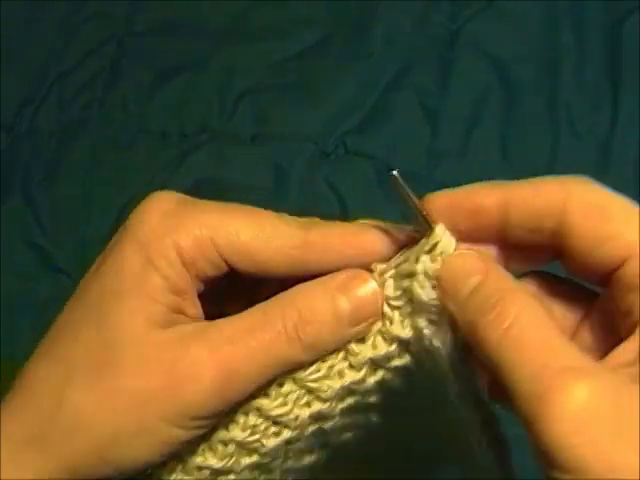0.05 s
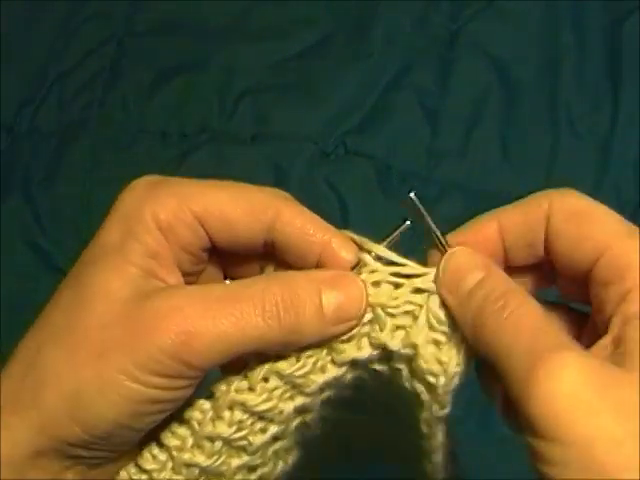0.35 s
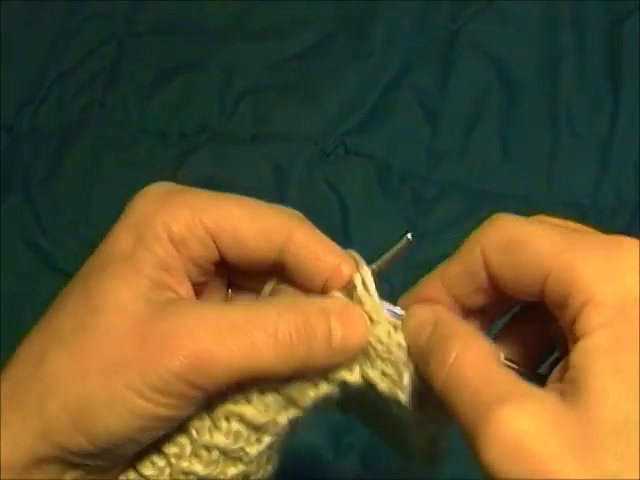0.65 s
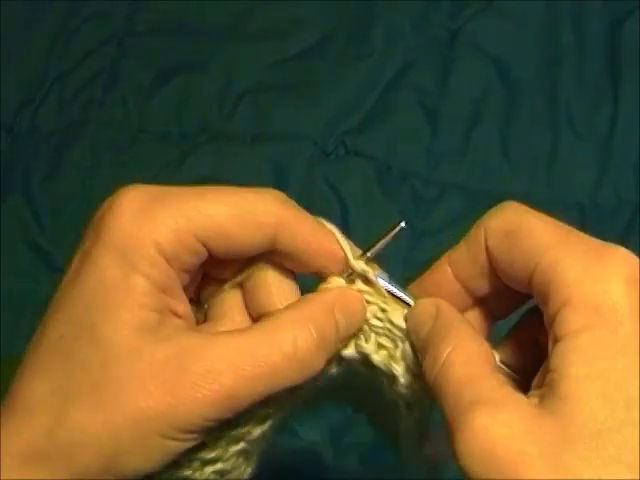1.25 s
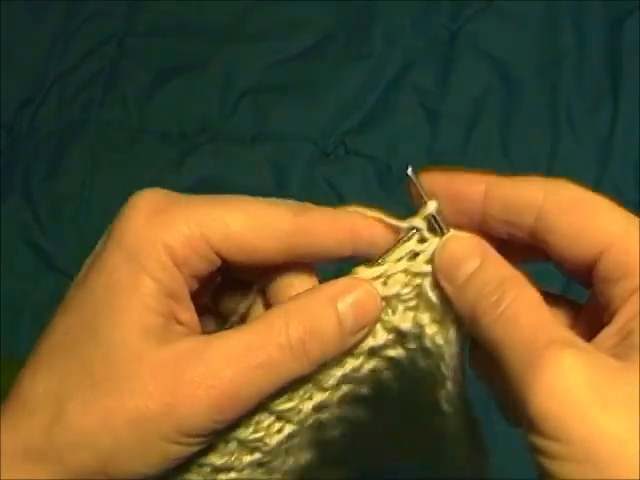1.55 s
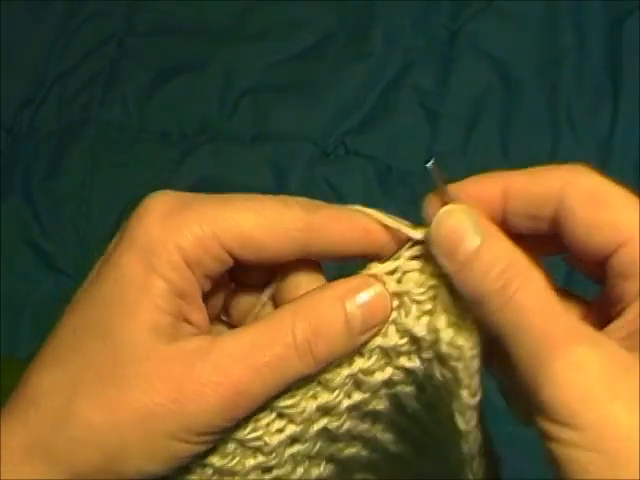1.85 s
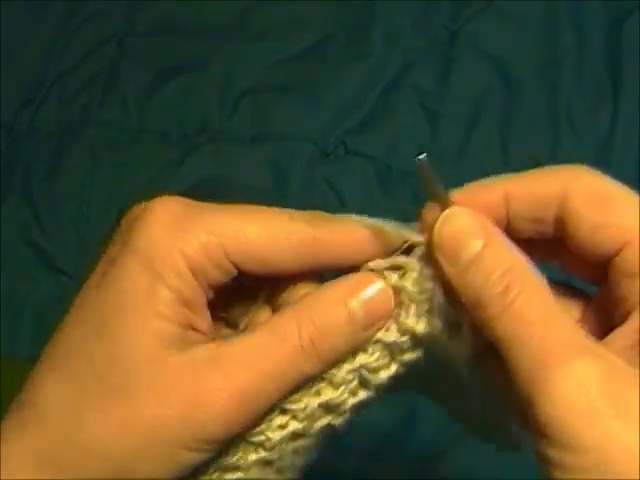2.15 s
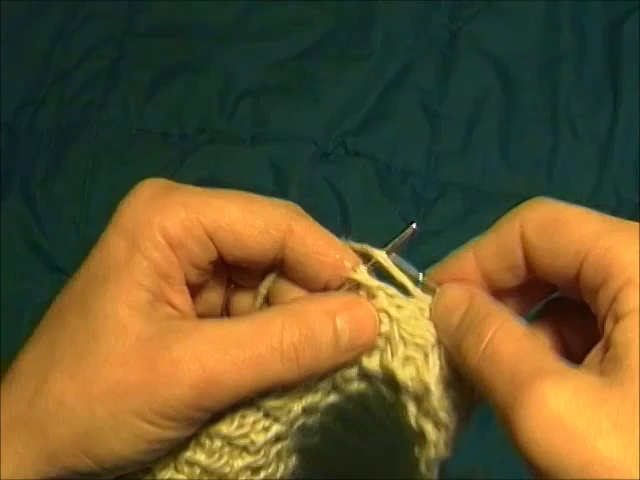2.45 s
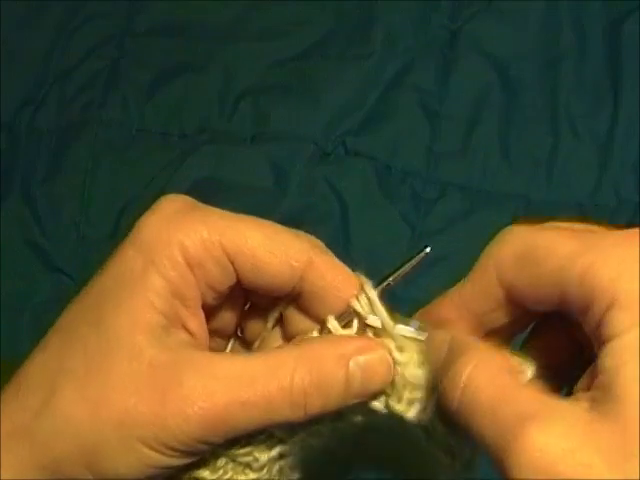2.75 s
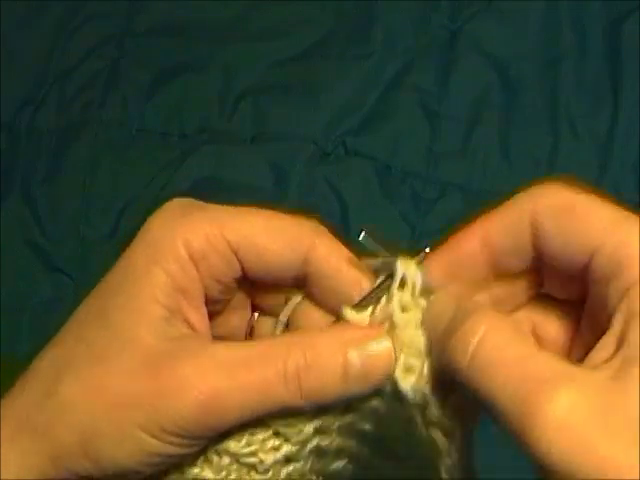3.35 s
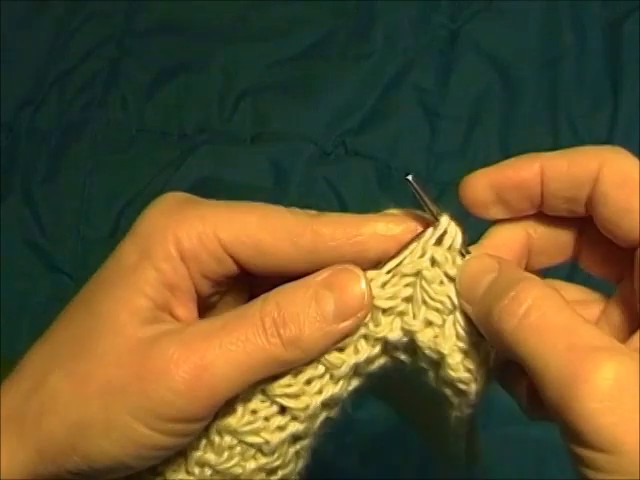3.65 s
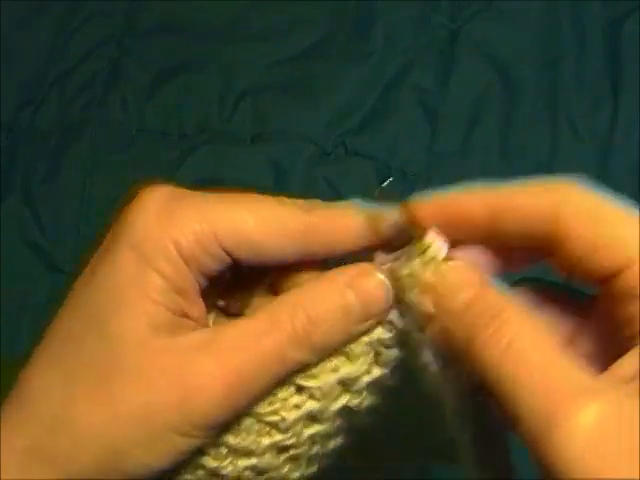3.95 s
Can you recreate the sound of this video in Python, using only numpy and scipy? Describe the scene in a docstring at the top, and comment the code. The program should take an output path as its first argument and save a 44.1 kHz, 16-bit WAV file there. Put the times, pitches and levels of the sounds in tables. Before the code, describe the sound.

Metal knitting needles tick faintly and yarn rustles over a steady room hum and hiss.

```python
"""A quiet room, with slow hand knitting close to a small microphone.
Two thin metal needles tick together, damped at once by fingers and wool. Yarn slides over them in soft
grainy strokes, a stitch catches now and then, and a finger bumps the work once. Needles and yarn sit
right of centre; under them lie mains hum, a faint motor whine and steady hiss."""
import sys
import numpy as np
from scipy import signal
from scipy.fft import rfft, irfft
from scipy.io import wavfile
from scipy.ndimage import uniform_filter1d

SR = 44100
rng = np.random.default_rng(int(sys.argv[2]) if len(sys.argv) > 2 else 0)


def wav_out(sig):
    """Save sig, one row per channel (or a flat mono array), as 16-bit PCM at SR to the path in sys.argv[1]."""
    wavfile.write(sys.argv[1], SR, np.round(np.clip(np.atleast_2d(sig).T, -1, 1) * 32767).astype(np.int16))


N = 176400
SCUFF_HZ = (3500, 10500)  # noise band of needle contacts and catching stitches


def undb(db):
    """Decibels to gain."""
    return 10 ** (np.asarray(db) / 20)


def pan(db):
    """Left and right gains for a level difference, left minus right."""
    return undb(np.array([[db], [-db]]) / 2)


def add(out, sound, start):
    """Mix a short sound into the stereo track at a time in seconds."""
    i = int(round(start * SR))
    out[:, i:i + sound.shape[1]] += sound[:, :N - i]


def band(x, edges_hz):
    """Gentle band-pass."""
    return signal.sosfilt(signal.butter(2, edges_hz, "band", fs=SR, output="sos"), x)


def unit(x):
    """Scale to rms 1."""
    return x / np.sqrt(np.mean(x ** 2))


def drift(rate_hz):
    """Slow random drift with rms 1."""
    hold = int(SR / rate_hz)
    steps = np.repeat(rng.standard_normal(N // hold + 1), hold)
    return unit(uniform_filter1d(steps, hold)[:N])


def fade(t, t60):
    """Exponential decay, 60 dB down after t60 seconds."""
    return np.exp(-np.log(1000) * t / t60)


def ring(t, modes):
    """Damped modes struck at t = 0."""
    return sum(undb(db) * fade(t, t60) * np.sin(2 * np.pi * hz * t) for hz, t60, db in modes)


def mains_hum():
    """Mains hum near the centre: a wavering fundamental under steady, mostly odd overtones."""
    # overtones of the mains (harmonic number, rms level [dB])
    overtones = [(2, -69), (3, -49), (4, -70.5), (5, -60), (7, -70.5), (9, -70.5), (11, -75), (17, -79),
                 (23, -82.5)]
    # contour of the fundamental (time [s], level before trim [dB])
    contour = [(0.0, -30), (0.03, -32.5), (0.08, -37.5), (0.12, -34), (0.63, -32), (1.28, -35.5),
               (2.16, -32), (2.23, -34), (2.38, -34), (2.66, -36), (2.71, -34), (3.09, -33), (3.13, -29.5),
               (3.2, -35.5), (3.22, -32), (3.89, -35), (3.98, -35.5), (4.0, -31)]
    mains_hz, trim_db, waver_db = 50, -1, 0.38
    t = np.arange(N) / SR
    phase = 2 * np.pi * mains_hz * t
    level_db = np.interp(t, *np.array(contour).T) + trim_db + waver_db * drift(rate_hz=16)
    fundamental = undb(level_db) * np.sin(phase)
    buzz = sum(undb(db) * np.sin(harmonic * phase) for harmonic, db in overtones)
    return np.sqrt(2) * (fundamental + buzz) * pan(db=-0.4)


def motor_whine():
    """A small motor, faint in the background: narrow bands of noise heard as unsteady tones."""
    # motor tones (frequency [Hz], half-width [Hz], rms level [dB])
    tones = [(3064, 22, -69.5), (3540, 130, -73.5), (7890, 14, -75)]
    out, freqs = np.zeros((2, N)), np.arange(N // 2 + 1) * SR / N
    for hz, half_width, db in tones:
        spectrum = rfft(rng.standard_normal((2, N))) / (1 + ((freqs - hz) / half_width) ** 2)
        out += undb(db) * unit(irfft(spectrum, N))
    return out


def hiss():
    """Even hiss of room and microphone, a little wider in the treble than in the upper bass."""
    # noise common to both channels (frequency [Hz], density before roll-off [dB/Hz])
    mid_curve = [(55, -70), (120, -81.5), (250, -87), (500, -91), (1000, -93), (2500, -95.5), (6000, -97.5),
                 (10300, -97.5), (11500, -100)]
    # noise opposite in the two channels (frequency [Hz], density before roll-off [dB/Hz])
    side_curve = [(25, -88), (50, -70), (100, -87), (250, -91), (500, -94), (1000, -96), (2500, -98),
                  (6000, -99), (10300, -99.5), (11500, -102)]
    low_cut_hz, high_cut_hz = 30, 11480
    freqs = np.maximum(np.arange(N // 2 + 1) * SR / N, 1)
    roll_off = 1 / np.sqrt((1 + (low_cut_hz / freqs) ** 4) * (1 + (freqs / high_cut_hz) ** 160))

    def coloured(curve):
        hz, db = np.array(curve).T
        shape = roll_off * undb(np.interp(np.log(freqs), np.log(hz), db))
        return irfft(rfft(rng.standard_normal(N)) * shape, N) * np.sqrt(SR / 2)

    mid, side = coloured(mid_curve), coloured(side_curve)
    return np.array([mid + side, mid - side]) * pan(db=-0.6)


def needle_ticks():
    """Held needles touch and bounce once by the microphone: each hit is a short ring and a scuff."""
    # needle contacts (time [s], level [dB], bounce delay [ms], bounce gain [dB], main ring [Hz],
    # low-mode gain [dB], scuff gain [dB], left minus right [dB])
    contacts = [(0.6673, -30.5, 0.71, -13, 9600, -14, -12, -8), (0.738, -42.5, .89, -2, 4500, -12, -10, -2),
                (1.0402, -33.5, 0.91, -5, 9100, 1, 1.5, -6), (1.3267, -42, .56, 4, 6700, 2.5, 1, -5),
                (1.5265, -34.5, 1.0, -14, 10200, -20, -14, -1), (1.6525, -41, 1.4, 7.5, 9900, 4.5, -6, -3),
                (2.6085, -34, 0.8, -1.5, 10060, -22, -11, -6), (3.0222, -35.5, 0.6, -10, 9300, -7, -10, -7),
                (3.3096, -45, .7, -3, 9000, 1, 2, -4), (3.7327, -45, 2.4, 2.5, 9900, -1, -3, -4)]
    # low and high modes of a held needle (frequency [Hz], t60 [s], relative level [dB])
    low_modes = [(3650, 0.0063, -17), (5440, 0.0061, -13.5)]
    high_modes = [(6760, 0.0024, -11), (8430, 0.003, -11.5), (10850, 0.0088, -12.5)]
    ring_t60_s, ring_gain_db = .005, -3.5
    out, t = np.zeros((2, N)), np.arange(SR // 20) / SR
    for start, db, bounce_ms, bounce_db, ring_hz, low_db, scuff_db, pan_db in contacts:
        main_mode = (ring_hz, ring_t60_s, ring_gain_db)
        metal = ring(t, high_modes + [main_mode]) + undb(low_db) * ring(t, low_modes)
        for lag, gain in ((0, 1), (bounce_ms / 1000, undb(bounce_db))):
            noise = rng.standard_normal((3, len(t)))  # left, right, common to both
            grit = (noise[:2] + noise[2]) / np.sqrt(2)
            scuff = undb(scuff_db) * band(grit * fade(t, t60=.004), SCUFF_HZ)
            add(out, undb(db) * gain * pan(pan_db) * (metal + scuff), start + lag)
    return out


def fibres(edges_hz):
    """Dense tiny slips of wool fibres, partly alike in both channels."""
    slips_per_s, spread_db = 5000, 2
    shape = (3, N)  # left, right, common to both
    slipping = rng.random(shape) < slips_per_s / SR
    slips = slipping * rng.standard_normal(shape) * undb(spread_db * rng.standard_normal(shape))
    return unit(band(slips[:2] + slips[2], edges_hz))


def yarn():
    """Close strokes swell and fade as wool slides over a needle; now and then a stitch catches."""
    # yarn strokes (peak time [s], rise [s], fall [s], relative level [dB], treble over body [dB])
    strokes = [(.725, 0.073, 0.045, -59, 2.5), (.935, .04, .09, -53.5, 0.5), (1.07, 0.032, .04, -60, -8),
               (1.21, .05, 0.045, -60.5, 3.5), (1.555, 0.063, 0.039, -51.5, -0.5),
               (1.652, .008, .008, -53, -1), (2.37, .07, .09, -63, 0), (2.66, .04, .06, -64, 0),
               (3.42, 0.17, .14, -59, -2), (3.65, .05, .05, -52.5, -12)]
    # stitches catching on the needle tip (time [s], relative level [dB])
    snags = [(.9115, -46), (.9337, -47), (1.5461, -40), (1.5602, -34.5), (1.569, -41)]
    out, t = np.zeros((2, N)), np.arange(N) / SR
    body, treble = fibres(edges_hz=(3650, 6300)), fibres(edges_hz=(7400, 10850))
    for peak, rise, fall, db, treble_db in strokes:
        swell = np.exp(-((t - peak) / np.where(t < peak, rise, fall)) ** 2)
        out += undb(db) * swell * (body + undb(treble_db) * treble) / 2
    decay = fade(t[:SR // 50], t60=.0033)
    for start, db in snags:
        snap = band(rng.standard_normal((2, len(decay))) * decay, SCUFF_HZ)
        add(out, undb(db) * snap, start)
    return out * pan(db=-6.5)


def finger_bump():
    """A finger knocks dully against the work, dead centre: a few low modes and a soft thud."""
    # modes of the bumped work (frequency [Hz], t60 [s], relative level [dB])
    modes = [(245, 0.058, 2), (310, 0.05, 1), (437, 0.027, 1), (823, 0.041, 4), (1105, 0.039, 0)]
    gain_db, thud_db, attack_s = -44.5, -3.5, .005
    out, t = np.zeros((2, N)), np.arange(SR // 10) / SR
    noise = unit(band(rng.standard_normal(len(t)), edges_hz=(180, 1100)))
    thud = undb(thud_db) * noise * fade(t, t60=.025)
    attack = np.minimum(t / attack_s, 1)
    add(out, undb(gain_db) * pan(db=0) * (ring(t, modes) + thud) * attack, start=1.026)
    return out


def scene():
    """Knitting close to the microphone, over the steady background of the room."""
    knitting = needle_ticks() + yarn() + finger_bump()
    return knitting + mains_hum() + motor_whine() + hiss()


def record(dry):
    """The recorder cuts the top steeply."""
    top_hz = 11750
    return signal.sosfilt(signal.ellip(8, .1, 80, top_hz, fs=SR, output="sos"), dry)


dry = scene()
out = record(dry)
wav_out(out)
```